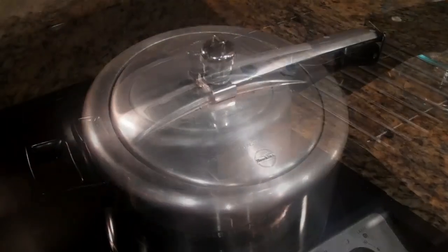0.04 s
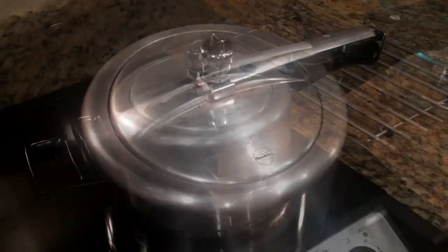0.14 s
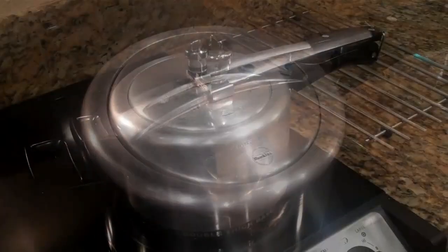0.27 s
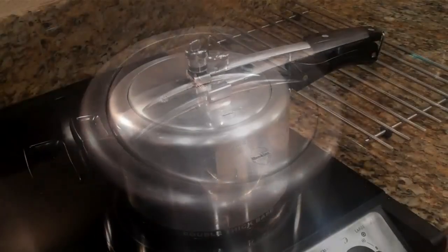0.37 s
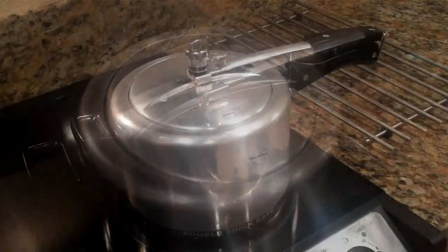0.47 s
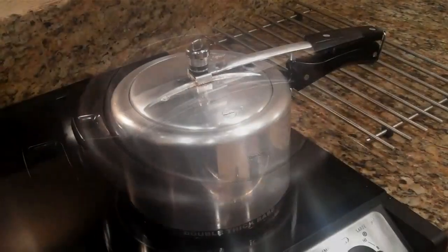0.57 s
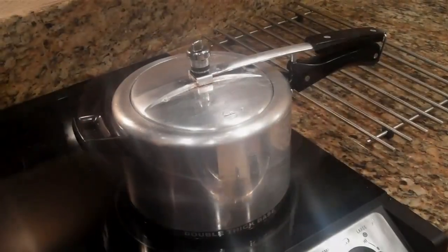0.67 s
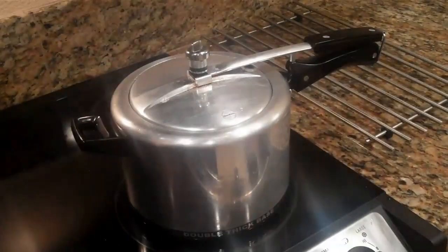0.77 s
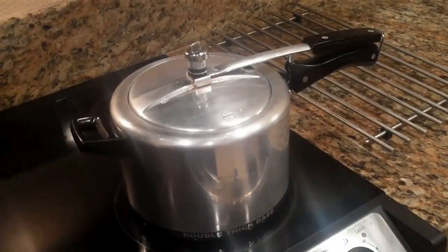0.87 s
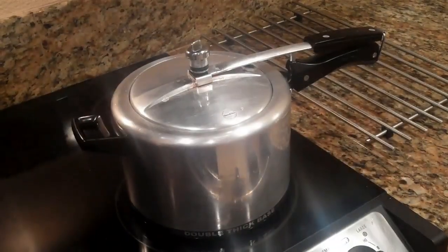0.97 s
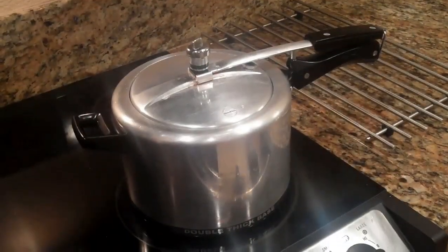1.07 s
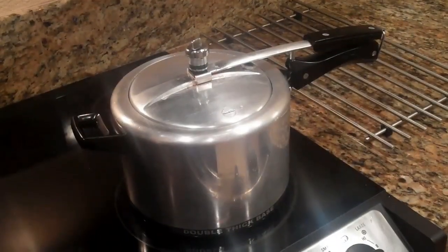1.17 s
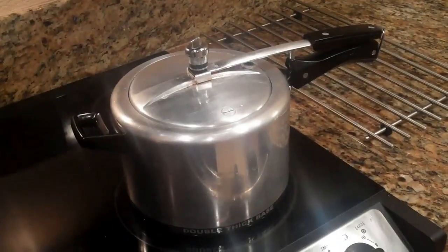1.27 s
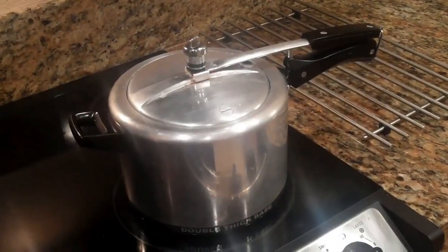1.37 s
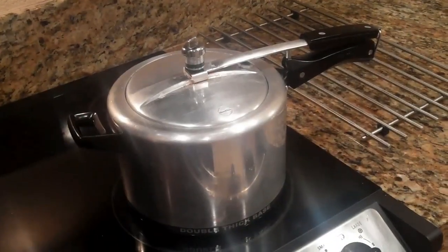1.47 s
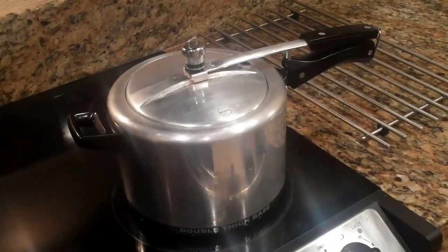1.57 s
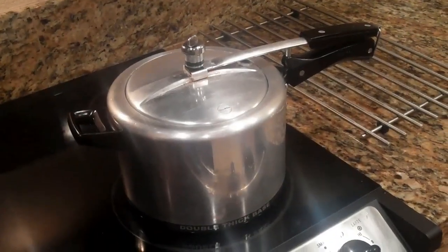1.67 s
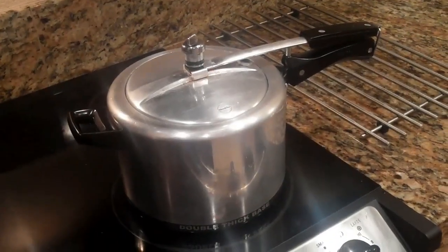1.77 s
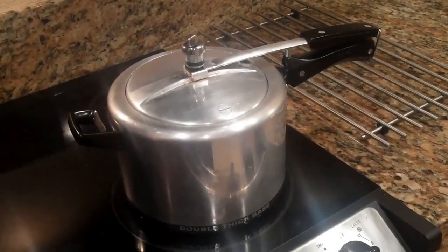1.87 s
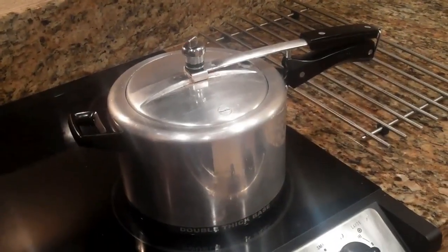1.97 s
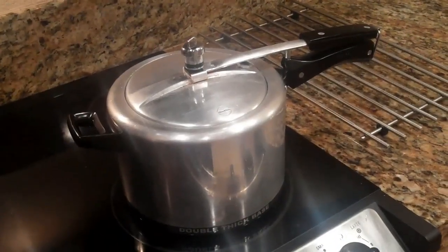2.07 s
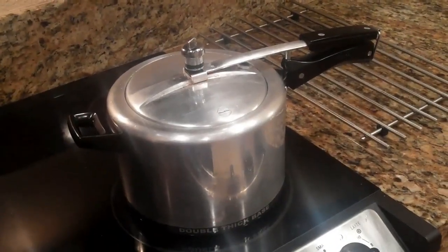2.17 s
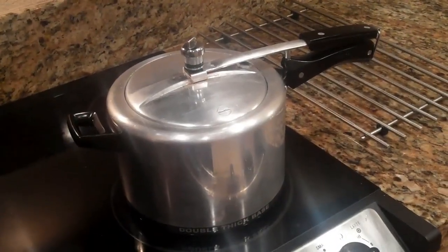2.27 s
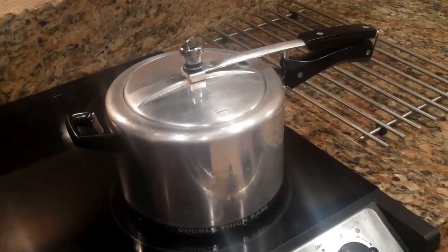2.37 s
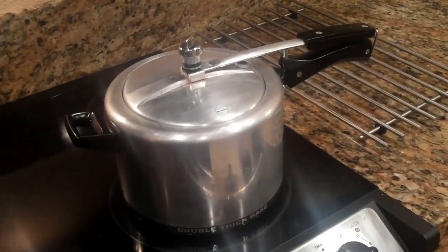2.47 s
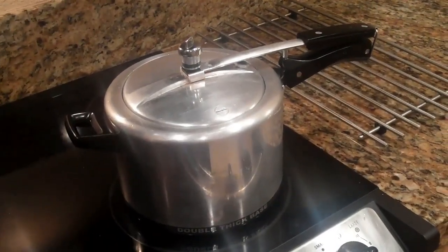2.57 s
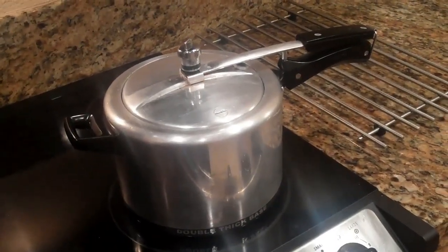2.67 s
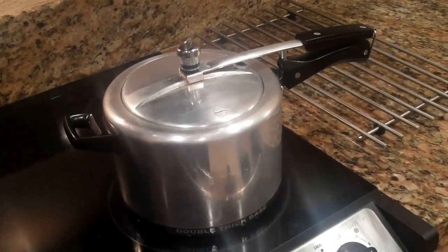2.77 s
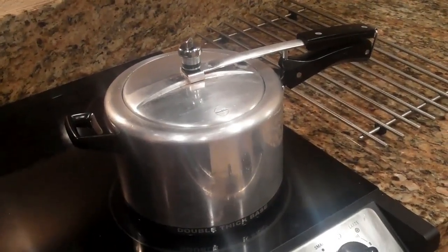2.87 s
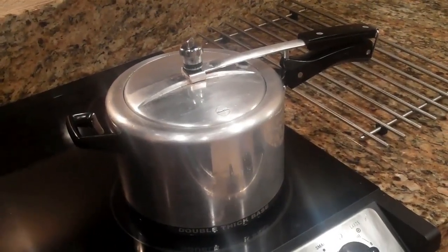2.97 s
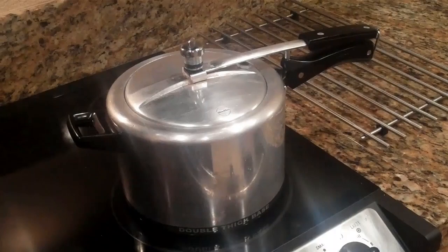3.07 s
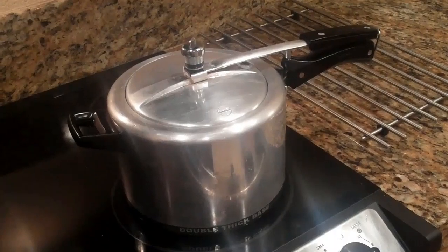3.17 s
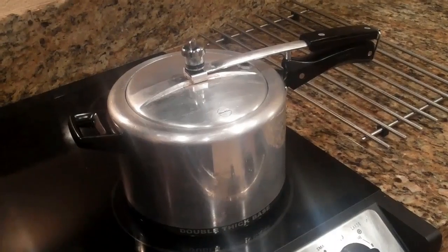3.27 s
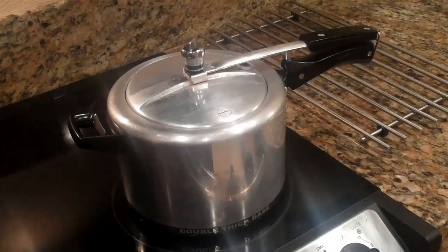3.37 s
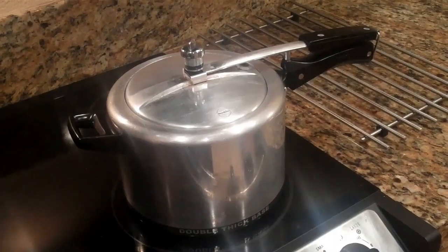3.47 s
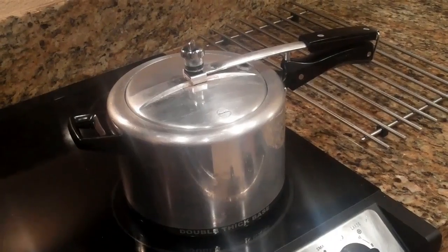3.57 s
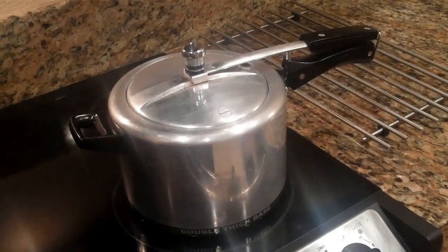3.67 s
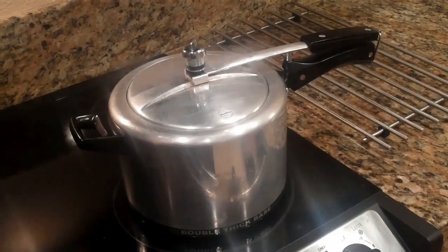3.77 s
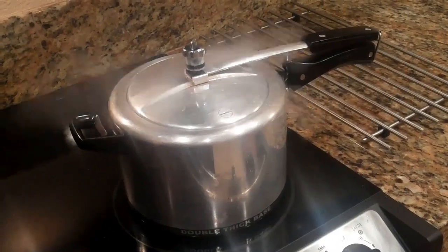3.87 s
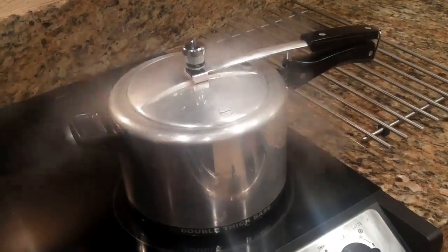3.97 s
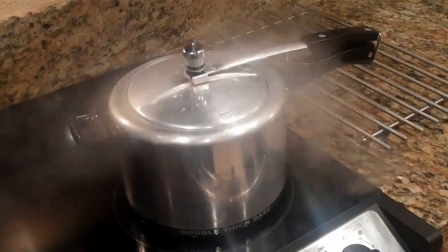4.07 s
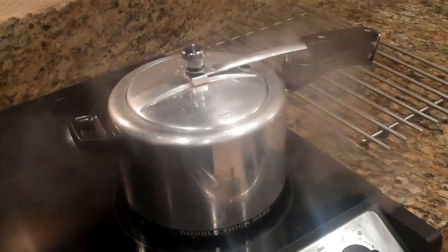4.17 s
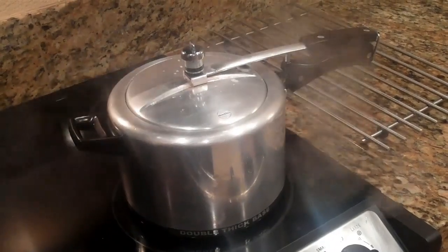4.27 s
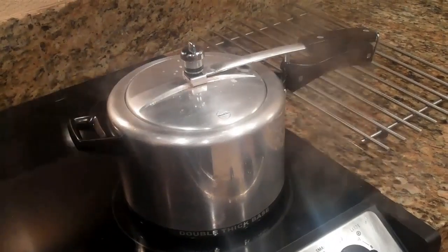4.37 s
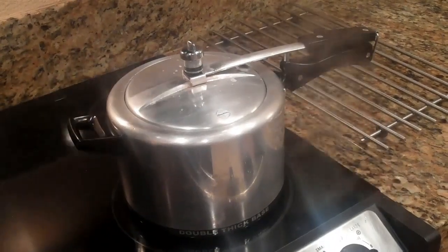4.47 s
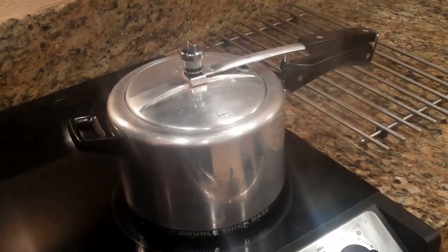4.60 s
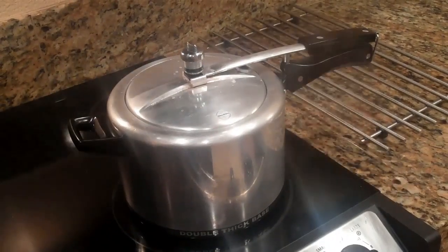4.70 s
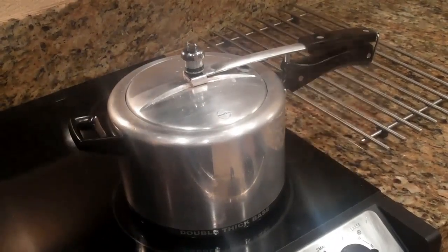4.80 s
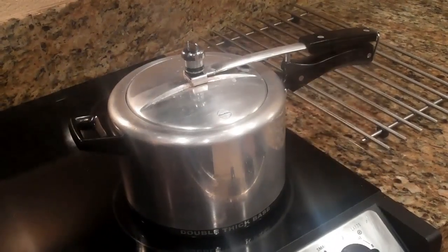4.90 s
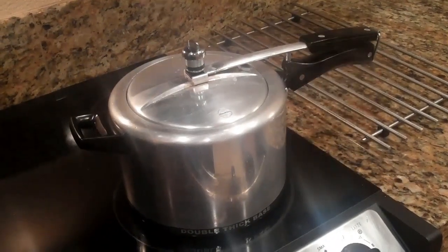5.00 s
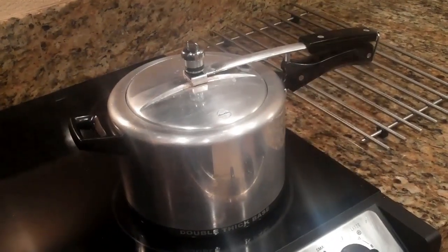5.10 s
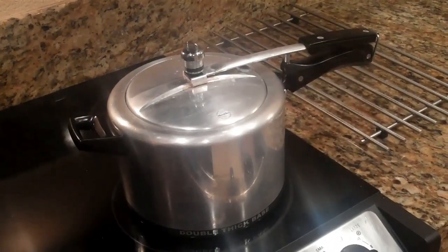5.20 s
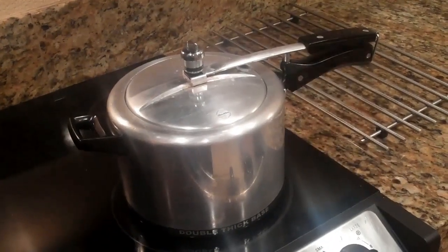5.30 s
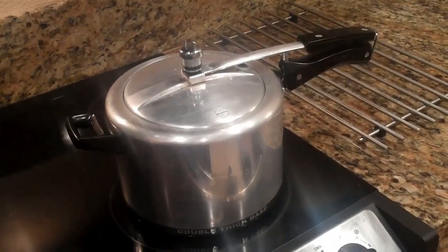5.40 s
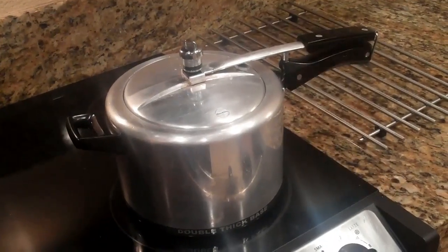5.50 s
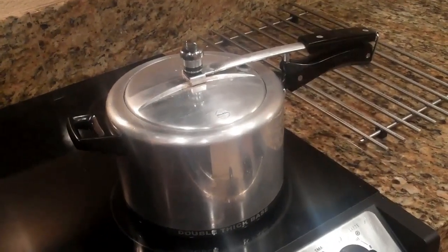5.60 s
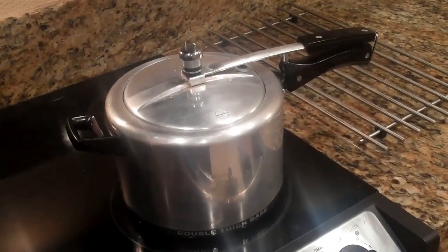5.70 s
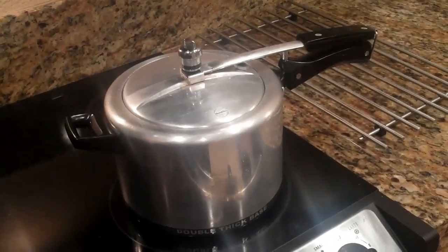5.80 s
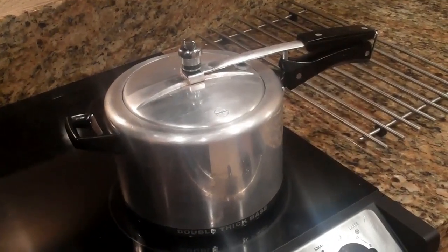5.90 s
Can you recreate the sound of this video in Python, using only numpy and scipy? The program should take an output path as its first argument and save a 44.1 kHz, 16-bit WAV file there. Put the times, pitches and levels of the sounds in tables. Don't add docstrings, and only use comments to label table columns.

```python
import sys
import numpy as np
from scipy import signal
from scipy.fft import rfft, irfft, next_fast_len
from scipy.io import wavfile
from scipy.ndimage import uniform_filter1d, map_coordinates

SR = 44100
rng = np.random.default_rng(int(sys.argv[2]) if len(sys.argv) > 2 else 0)


def undo_db(level):
    steps = np.asarray(level, float) / 20
    return 10 ** steps


def persist_wave(psi):
    counts = np.round(np.clip(psi, -1, 1) * 32767).astype(np.int16)
    wavfile.write(sys.argv[1], SR, np.atleast_2d(counts).T)


N = 262218
T = np.arange(N) / SR


def unit(x):
    return x / np.sqrt(np.mean(x ** 2) + 1e-20)


def along(points, hz):
    f, v = np.transpose(points)
    return np.interp(np.log(hz + 1), np.log(f + 1), v)


def curve(rows, at=T):
    s, value = np.transpose(rows)
    return np.interp(at, s, value)


def wobble(rate):
    knots = rng.standard_normal(int(N * rate / SR) + 4)
    return map_coordinates(knots, [T * rate])


def filtered(x, response):
    m = next_fast_len(N + SR // 2)
    return irfft(rfft(x, m) * response(np.fft.rfftfreq(m, 1 / SR)), m)[..., :N]


def peaked(peaks, f):
    power = 1
    for centre, width, db in peaks:
        band = (f * width) ** 2
        power = power + undo_db(2 * db) * band / ((centre ** 2 - f ** 2) ** 2 + band)
    return np.sqrt(power)


# pitch_hz, likeness (0 to 1)
LIKENESS = [(60, .45), (300, .6), (1200, .72), (2700, .9), (4400, .85), (5500, .57), (7500, .45),
            (8500, .63), (10000, .86), (12000, .83), (14000, .4)]


def rush(colour, patchy_db, spread=0.93):
    z = signal.stft(rng.standard_normal((2, N)), nperseg=256)[2]
    field = rng.standard_normal(z.shape[1:])
    field = uniform_filter1d(uniform_filter1d(field, size=4, axis=0), size=8, axis=1)
    pair = signal.istft(z * undo_db(patchy_db * unit(field)), nperseg=256)[1][:, :N]

    def mid_side(f):
        turn = np.arccos(np.clip(along(LIKENESS, f) ** spread, 0, 1)) / 2
        return colour(f) * np.array([np.cos(turn), np.sin(turn)])

    mid, side = filtered(pair, mid_side)
    return np.array([mid + side, mid - side])


def coloured_rush(spectrum, patchy_db, spread=0.93):
    return unit(rush(lambda f: undo_db(along(spectrum, f)), patchy_db, spread))


def ring(s, db, modes):
    out, first = np.zeros(N), int(s * SR)
    t = T[first:first + SR // 3] - T[first]
    wave = sum(undo_db(level - 60 * t / t60) * np.sin(2 * np.pi * hz * t) for hz, level, t60 in modes)
    onset = 1 - np.exp(-t / 0.00052)
    out[first:first + len(t)] = undo_db(db - gain_db(s)) * wave * onset
    return out


# multiple of the buzz, level_db
HUM = [(1, -75.5), (2, -73), (3, -55.5), (4, -76.5), (5, -73.5), (6, -73.5), (7, -77), (8, -72), (9, -83),
       (10, -79.5)]
# pitch_hz, level_db per Hz
ROOM_AIR = [(8, -120), (15, -8.5), (35, 2), (60, -5.5), (130, -6), (250, -4.5), (500, -10), (900, -11.5),
            (2000, -120)]


def appliance():
    mains_hz = 119.95
    turns = 2 * np.pi * (mains_hz * T + 0.006 * wobble(3.6))
    buzz = np.zeros(N)
    for multiple, db in HUM:
        level = np.sqrt(2) * undo_db(db + 0.55 * wobble(9.2))
        buzz += level * np.sin(multiple * turns + rng.uniform(0, 2 * np.pi))
    return buzz + undo_db(-61.5) * coloured_rush(ROOM_AIR, patchy_db=2.0, spread=2.2)


# pitch_hz, level_db per Hz
SIMMER = [(260, -19), (450, -6.5), (559, -11), (610, -3.5), (675, -10.5), (737, -2), (2120, -3), (4650, -1),
          (5860, -6), (10500, -17), (14400, -21)]
# start_s, level_db (peak as heard), pitch_hz, t60_s
TICKS = [(.32, -57, 175, .25), (.335, -36, 3000, .008), (5.177, -45, 4710, .01), (5.36, -54, 3850, .06),
         (5.405, -47, 3800, .012), (5.496, -38.5, 4600, .008), (5.581, -39.5, 4500, .016),
         (5.675, -36, 4400, .007), (5.694, -51, 1080, .11), (5.698, -52, 1230, .06),
         (5.698, -53, 1420, .06), (5.703, -55, 1650, .05), (5.925, -46, 4400, .015)]


def pot():
    leak_db = -52.5 + 0.6 * wobble(0.92) + 0.63 * wobble(25)
    sound = undo_db(leak_db) * coloured_rush(SIMMER, patchy_db=1.0, spread=2.2)
    for s, db, hz, t60 in TICKS:
        sound += ring(s, db, [(hz, 0, t60), (hz * 1.24, -2, .006), (hz * .86, -4, .005)])
    return sound


# start_s, length_ms, level_db
PUFFS = [(.01, 69, -37), (.145, 92, -32.5), (.281, 77, -33.5), (.412, 102, -31.5), (.568, 83, -35),
         (.715, 103, -27.5), (.857, 90, -33), (1.014, 107, -28), (1.151, 86, -33.5), (1.305, 98, -28),
         (1.433, 89, -37), (1.584, 112, -28.5), (1.71, 88, -39), (1.869, 132, -27.5), (2.036, 79, -36),
         (2.18, 92, -29.5), (2.303, 90, -37), (2.46, 123, -27.5), (2.609, 101, -36), (2.765, 95, -28),
         (2.889, 104, -35.5), (3.061, 102, -26.5), (3.141, 94, -27.5), (3.305, 120, -29), (3.457, 78, -36),
         (3.581, 78, -30)]
# time_s, level_db of the jet
BLAST = [
    (3.62, -44),
    (3.69, -26),
    (3.76, -26),
    (3.86, -5),
    (4.0, -6),
    (4.13, -4.5),
    (4.16, -15),
    (4.21, -25),
    (4.3, -53.5),
]


def vent_power():
    slow = T[::32]
    lift_s, reseat_s = BLAST[0][0], BLAST[-1][0]
    jet_db = curve(BLAST, slow)
    fizz_db = np.minimum(3 + 0.3 * (-5 - jet_db), 8.5)
    fizz_db = np.where(slow < reseat_s, fizz_db, 4.5)
    body = undo_db(np.where(slow < lift_s, -120, jet_db)) ** 2
    fizz = body * undo_db(2 * fizz_db)
    for opens, length, db in PUFFS:
        stronger_db = db + 33
        rise = length * np.clip(0.63 + 0.35 * stronger_db, 1 / 4, 3 / 4)
        fall = length - rise
        peak_s = opens + rise / 1000
        away = np.abs(1000 * (slow - peak_s) / np.where(slow < peak_s, rise, fall))
        power = undo_db(2 * (db - 6 * away ** 2.5))
        body += power
        fizz += power * undo_db(2 * (1.9 + 0.48 * stronger_db))
    return np.interp(T, slow, body), np.interp(T, slow, fizz)


# pitch_hz, level_db per Hz
JET = [(290, -52.5), (500, -27.5), (1100, -19), (1400, -21), (1750, -16), (2250, -15), (2660, -6),
       (5230, -1.5), (6370, -2.5), (6930, -0.5), (8320, -4.5), (10900, -1), (12200, -4), (14400, -17)]
# pitch_hz, width_hz, level_db
VENT = [
    (1753, 81, 4.5),
    (3633, 110, 3),
    (4040, 100, 2),
    (4435, 110, 1.5),
    (4840, 54, -5),
    (5310, 62, -0.5),
    (6050, 83, 0.5),
    (9680, 39, -5.5),
]


def steam():
    body, fizz = vent_power()

    def colour(f):
        return undo_db(along(JET, f)) * peaked(VENT, f)

    def high(f):
        return 1 / (1 + (6200 / (f + 1)) ** 4)

    flutter = undo_db(0.7 * wobble(45) + 0.57 * wobble(300))
    low_part = unit(rush(lambda f: colour(f) * np.sqrt(1 - high(f)), patchy_db=1.2))
    high_part = unit(rush(lambda f: colour(f) * np.sqrt(high(f)), patchy_db=0.15))
    return flutter * (undo_db(-4.0) * np.sqrt(body) * low_part + undo_db(-6.5) * np.sqrt(fizz) * high_part)


# start_s, level_db (peak as heard)
KNOCKS = [(0.71, -52), (1.007, -44), (1.134, -49), (1.291, -42), (1.578, -45.5), (1.699, -43.5),
          (1.865, -44), (2.029, -52), (2.155, -40.5), (2.277, -55), (2.443, -38), (2.61, -46), (2.734, -39),
          (3.03, -39.5), (3.156, -44.5), (3.318, -40.5), (3.606, -43), (3.815, -37.5), (4.175, -45),
          (4.229, -50.5)]
# pitch_hz, level_db, t60_s
LID = [(792, -4.5, 0.099), (1010, 1.5, .1), (1080, -9.5, 0.11), (1324, -2.5, 0.076), (1710, -2, 0.054),
       (895, -6, 0.098), (1140, -5.5, .04), (1470, -5.5, .04), (680, -9, .05)]
# time_s, level_db
SEEP = [
    (0, -65),
    (1, -58.5),
    (3.5, -67),
    (3.8, -49),
    (4.2, -76),
    (5.95, -75),
]
# pitch_hz, level_db per Hz
HOLLOW = [(300, -40.5), (600, -18), (750, -3), (1000, -3.5), (1400, -4.5), (1800, -2.5), (2200, -5.5),
          (5000, -23), (9000, -62.5)]


def weight():
    knocks, gasp = np.zeros(N), np.zeros(N)
    for s, db in KNOCKS:
        chance_db = rng.normal(0, 2.3, len(LID))
        modes = [(hz, level + c, t60) for (hz, level, t60), c in zip(LID, chance_db)]
        knocks += ring(s, db - 5.5, modes)
        gasp += (T > s) * undo_db(db - 12.5 - gain_db(s) - 60 * np.abs(T - s) / 0.3)
    return knocks + (undo_db(curve(SEEP)) + gasp) * coloured_rush(HOLLOW, patchy_db=1.0)


# delay_s, level_db
EARLY = [(.0031, -17), (.0046, -15), (.0073, -14), (.0109, -14), (.0152, -15), (.0214, -17)]


def nearby(x):
    delay, db = np.transpose(EARLY)
    delay = delay + rng.normal(0, 4e-5, (2, len(EARLY)))

    def comb(f):
        return 1 + sum(undo_db(g) * np.exp(-2j * np.pi * f * d[:, None]) for d, g in zip(delay.T, db))

    return filtered(x, comb) / np.sqrt(1 + np.sum(undo_db(2 * db)))


# pitch_hz, t60_s
ROOM_DECAY = [(200, .4), (1000, 1), (4000, 0.78), (10000, 0.58)]
# pitch_hz, level_db
WALLS = [(100, -26), (600, -20.5), (1000, -9.5), (4000, -12.5), (12000, -16.5)]


def kitchen(x):
    hz, t, z = signal.stft(rng.standard_normal((2, SR)), SR, nperseg=256)
    decay = undo_db(-60 * t / along(ROOM_DECAY, hz)[:, None])
    energy = np.sum(decay ** 2, axis=1, keepdims=True) * 128
    decay *= undo_db(along(WALLS, hz))[:, None] / np.sqrt(energy)
    tail = signal.istft(z * decay, SR, nperseg=256)[1]
    late = np.pad(x, ((0, 0), (400, 0)))
    return signal.fftconvolve(late, tail, axes=1)[:, :N]


# pitch_hz, level_db per Hz
ROAR = [(20, -120), (40, -14.5), (120, -11.5), (250, -2.5), (500, -4), (900, -1), (2000, -0.5),
        (4000, -10.5), (9000, -42), (14000, -120)]


def buffet():
    cloud_s, shut_s, edge_s = 3.811, 4.147, 0.003
    arriving_db = -18 * np.exp(-np.maximum(T - cloud_s, 0) / 0.065)
    sag_db = -5 * np.exp(-np.abs(shut_s - T) / 0.04)
    there = (1 + np.tanh((T - cloud_s) / edge_s)) * (1 + np.tanh((shut_s - T) / edge_s)) / 4
    roar_db = -13.5 + arriving_db + sag_db + 1.6 * wobble(60)
    roar = undo_db(roar_db) * coloured_rush(ROAR, patchy_db=1.0, spread=3.0)
    shove = ring(3.84, -40, [(26.1, 3.5, .16), (48, -6, .3), (85, -9.5, .25), (151.5, -6.5, 0.22)])
    return roar * undo_db([[1.5], [-1.5]]) * there + shove


def gain_db(s):
    opening_rise = -7.5 * np.exp(-s / 0.35)
    down = np.clip((s - 3.62) / 0.55, 0, 1)
    duck = -23 * np.sin(np.pi / 2 * down) ** 2
    back = 1 - np.exp(-np.maximum(s - 4.735, 0) / 0.075)
    return -0.39 + opening_rise + duck + (-5 - duck) * back


def scene():
    cooker, cloud = steam() + weight(), buffet()
    walls = kitchen(cooker + undo_db(-7) * cloud)
    return nearby(cooker) + walls + cloud + pot() + appliance()


def top_cut(x):
    return signal.sosfilt(signal.butter(12, 14580, fs=SR, output="sos"), x)


# pitch_hz, level_db left minus right
TILT = [(200, 0.5), (4000, .5), (6000, 0), (7000, -1.5), (8000, -1), (10000, -5), (11500, -1), (13000, 4.5)]
# pitch_hz, radians left leads
LEAD = [(500, 0), (5000, .35), (6500, 1.3), (7000, 1.8), (7600, .5), (9000, .7), (11500, 2.2), (14000, 2.8)]
# pitch_hz, width_hz, level_db
PORT = [(6660, 70, 7), (7070, 110, 4)]


def record(dry):
    def half(f):
        return undo_db(along(TILT, f) / 2) * np.exp(0.5j * along(LEAD, f))

    def pair(f):
        return np.array([half(f), peaked(PORT, f) / half(f)]) * (f < 14190)

    ports = filtered(dry, pair)
    drift = undo_db(-78) * np.array([wobble(80), wobble(80)]) - 0.00032
    return top_cut(ports * undo_db(gain_db(T)) + drift)


dry = scene()
out = record(dry)
persist_wave(out)
```